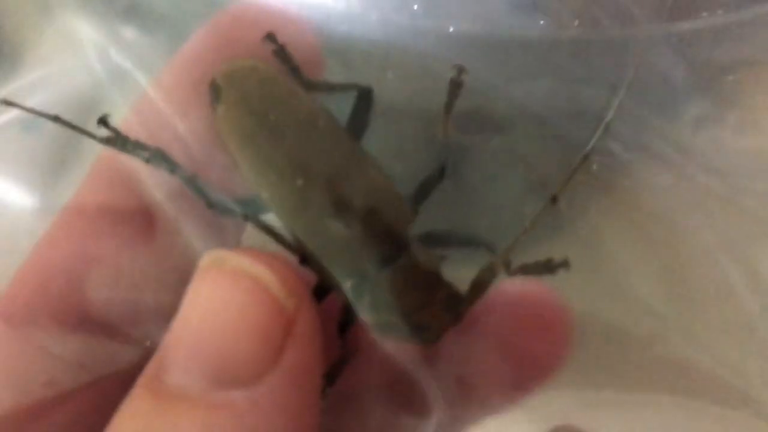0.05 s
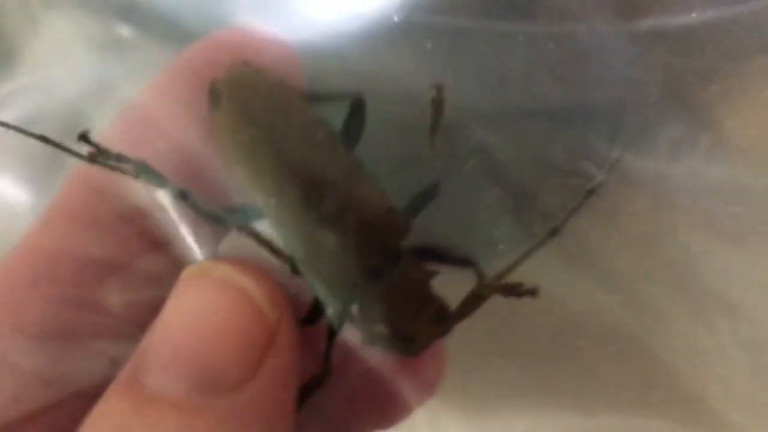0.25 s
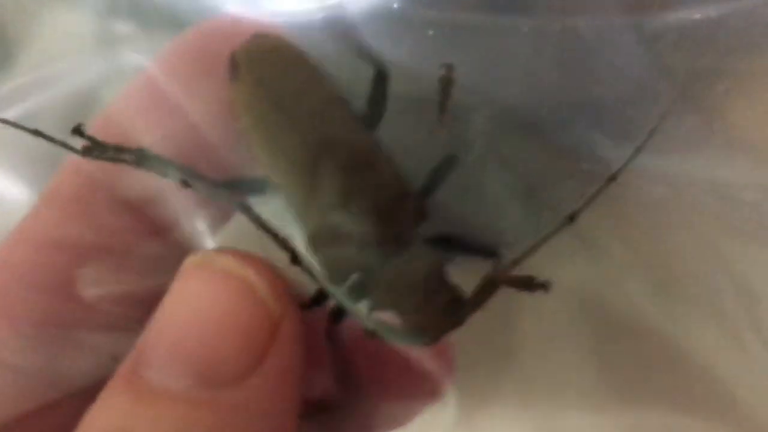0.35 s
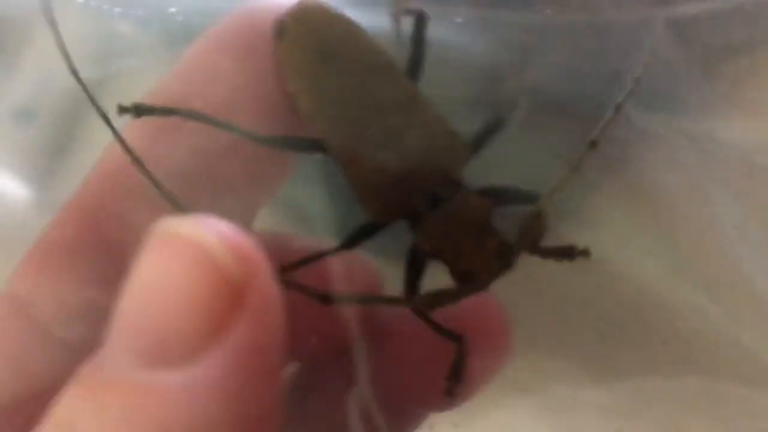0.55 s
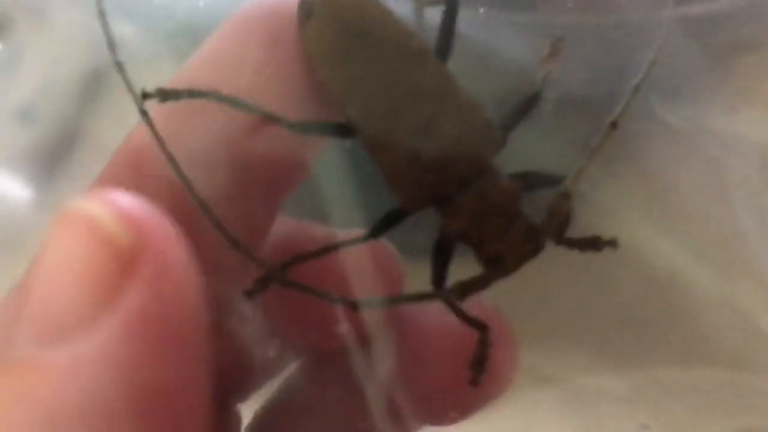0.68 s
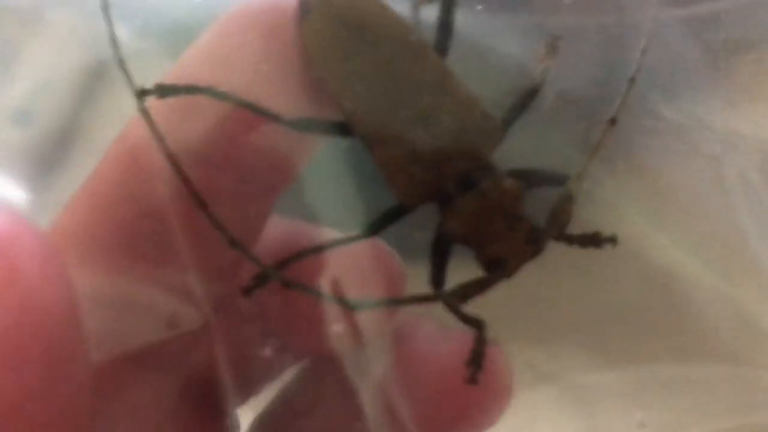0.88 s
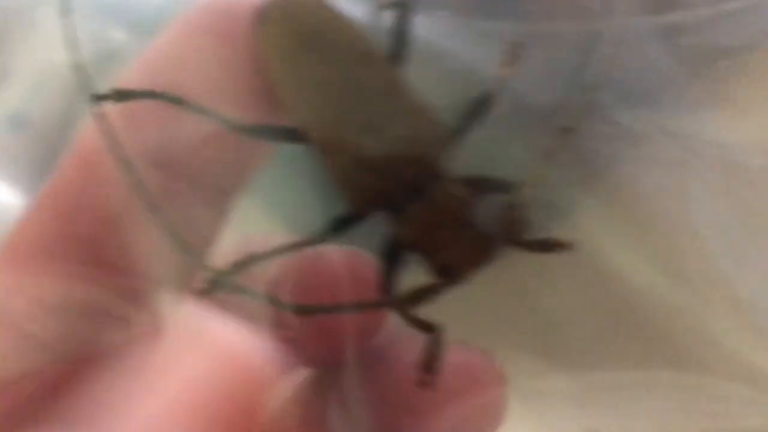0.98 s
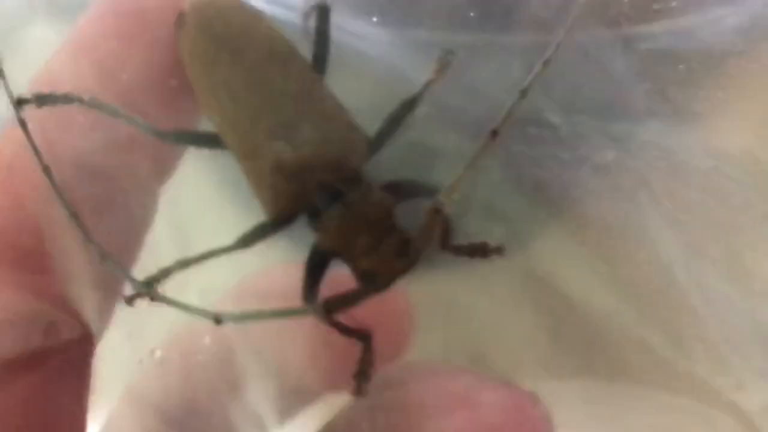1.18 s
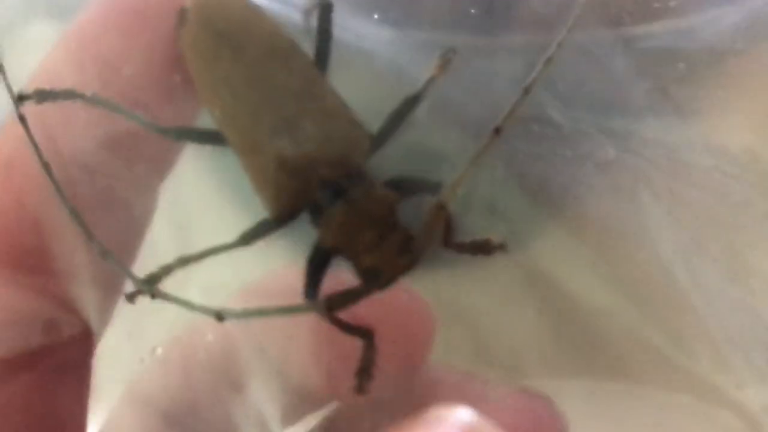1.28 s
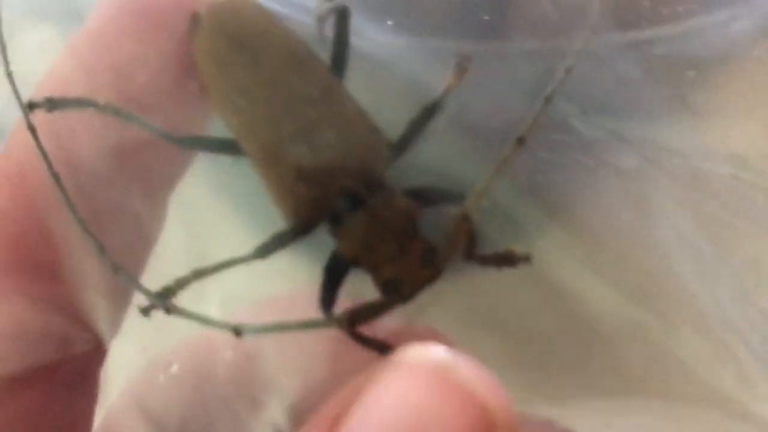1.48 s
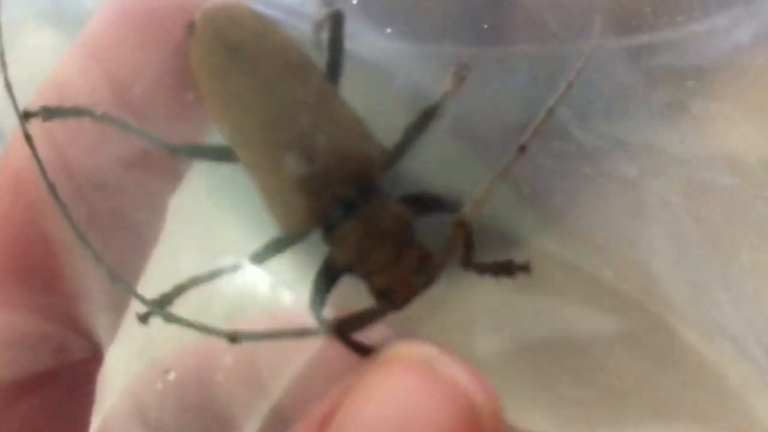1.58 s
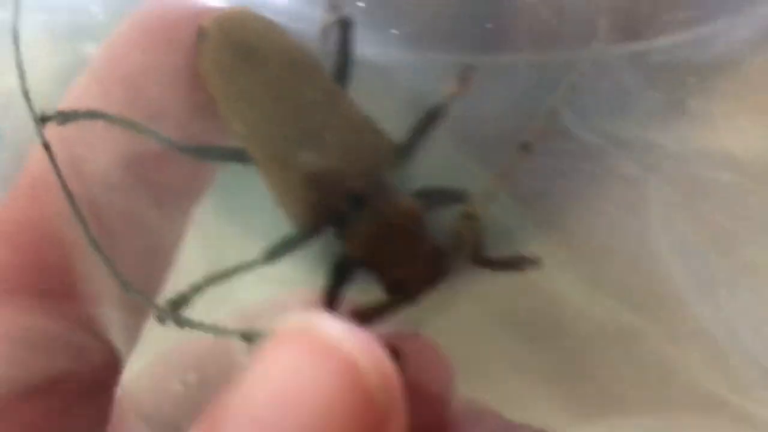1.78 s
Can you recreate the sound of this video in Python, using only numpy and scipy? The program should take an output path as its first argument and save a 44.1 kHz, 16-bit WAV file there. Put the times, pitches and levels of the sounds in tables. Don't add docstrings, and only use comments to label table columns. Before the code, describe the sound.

A beetle in a plastic bag squeaks raspily, close up in a quiet, low-humming room. Small crackles and a knock lead to a loud sharp snap at 0.2 s. A gritty buzzing rasp runs 0.3-0.45, with a brief higher return to 0.53; a weaker rasp follows at 0.56-0.72, with a faint zip until 0.8. Handling thumps mingle. Sparse ticks come near 1.0, then light crackles, faint creaks and dull bumps from 1.4 to 1.85.

```python
import sys
import numpy as np
from scipy import signal
from scipy.fft import rfft, irfft
from scipy.io import wavfile
from scipy.ndimage import uniform_filter1d

SR = 44100
rng = np.random.default_rng(int(sys.argv[2]) if len(sys.argv) > 2 else 0)


def elevation(decibels):
    levels = np.asarray(decibels, float)
    return 10 ** (levels / 20)


def log_audio(samples):
    frames = np.atleast_2d(samples).T
    limited = np.clip(frames, -1, 1)
    pcm = np.round(limited * 32767).astype(np.int16)
    wavfile.write(sys.argv[1], SR, pcm)


N = 81585
T = np.arange(N) / SR

# frequency in Hz, density in dB per Hz.
ROOM_SPECTRUM = [(16, -61), (28, -10.5), (127, -6), (170, -14.5), (211, -3), (378, -14), (421, -20),
                 (6320, -40), (16000, -46)]
# centre in Hz, width in Hz, level in dB.
APPLIANCE_HUMS = [(143, 10.3, -64), (198.5, 6.3, -69), (277.2, 30.8, -60.5), (4500, 120, -81.5),
                  (6160, 220, -77.5)]
# start in s, level in dB, pitch in Hz, T60 in s.
HAND_BUMPS = [
    (0.1418, -24, 346, 0.0074),
    (0.223, -36, 120, 0.036),
    (0.467, -35, 91.5, 0.036),
    (0.516, -29, 102.6, 0.041),
    (.561, -32.5, 136, 0.079),
    (1.652, -41.5, 110, 0.18),
    (1.667, -27, 285, 0.011),
    (1.687, -31, 283, 0.011),
    (1.831, -38, 103, 0.15),
]
# frequency in Hz, density in dB per Hz.
FILM_SPECTRUM = [(530, -6), (900, -48), (991, -2), (2140, -10), (4310, -6.5), (7140, -14), (12000, -14.5),
                 (16000, -45)]
# start in s, rise in s, T60 in s, level in dB, treble re the rest in dB.
FILM_RUSTLES = [
    (0.22, 0.0015, 0.16, -54, 1),
    (0.26, 0.0077, 0.62, -63, 3.5),
    (0.022, 0.003, .15, -61, -8),
    (0.927, 0.014, 1, -67, 5),
    (1.08, 0.0026, 0.033, -69, 1),
    (1.423, 0.0019, 0.38, -60.5, 4),
    (1.5, 0.0072, 0.22, -72, -10),
    (1.628, 0.0061, 0.32, -60.5, -11),
    (1.768, 0.041, 0.65, -61, -17),
]
# time in s, pitch in Hz, level in dB.
WAVERING_TONES = [
    [(1.5, 2500, -86), (1.53, 2350, -73), (1.6, 2080, -72), (1.66, 1900, -75), (1.69, 1850, -90)],
    [(1.49, 3500, -88), (1.52, 3480, -78), (1.62, 3350, -79), (1.67, 3250, -90)],
    [(.93, 4500, -88), (.96, 4500, -73), (1.04, 4480, -74), (1.08, 4450, -90)],
]
# start in s, peak in dB, ring in Hz, crack re peak in dB, knock re peak in dB.
BAG_SNAPS = [(.035, -60, 1500, -1, 13), (0.0841, -37, 980, -18, 5.5), (.105, -44.5, 1690, -12, -6),
             (0.1381, -27.5, 1140, -14, -14), (0.165, -47.5, 1500, -1, 14), (0.1895, -46, 4660, -14, 5),
             (.219, -9.5, 4350, -26, -17), (0.2192, -20, 1600, -16, -28), (.2191, -24, 9300, -30, -30),
             (.4301, -19.5, 2200, -24, -9), (.4615, -35, 2980, -13, -20), (0.4619, -38, 950, -24, -3.5),
             (0.5131, -35, 1100, -6, 2), (.541, -46, 950, -20, -2), (0.5605, -29, 2770, -34, -5.5),
             (1.0227, -44, 3900, -14, -30), (1.023, -41.5, 920, -13, -22), (1.089, -51, 12000, -31, -30),
             (1.081, -51, 2670, -14, -15), (1.254, -67, 4500, 9.5, -26), (1.4255, -40, 9300, -16, -41),
             (1.433, -47, 4200, -13, -16), (1.478, -55.5, 700, -15, 4), (1.515, -48, 2720, -16, 4),
             (1.536, -48, 1090, -10, 0), (1.5816, -42, 3800, -8.5, -24), (1.6425, -47.5, 2700, -1.5, 4),
             (1.645, -52.5, 4760, -10.5, -7), (1.659, -47.5, 3300, -7, -10), (1.67, -50, 765, -25, 14.5),
             (1.687, -50, 2880, -22, -9), (1.688, -46.5, 1050, -25, 9), (1.803, -55, 1400, -9, -3),
             (1.8245, -43, 1480, -12, -4), (1.832, -50, 9300, -9, 7)]
# time in s, ridge rate in Hz, level in dB.
PUSH_1_PATH = [
    (.308, 1078, -36.5),
    (.319, 1332, -33.5),
    (.339, 1508, -28.5),
    (.361, 1760, -28),
    (.377, 1674, -27.5),
    (.39, 1599, -28),
    (.428, 1505, -32),
    (.438, 950, -34),
    (.449, 611, -36.5),
]
RETURN_1_PATH = [
    (.465, 4300, -45),
    (.471, 4195, -38.5),
    (.482, 3900, -35),
    (.49, 3565, -38),
    (.5, 3370, -38.5),
    (.521, 3013, -42.5),
    (.529, 2730, -62),
]
PUSH_2_PATH = [
    (.563, 984, -41.5),
    (.584, 1301, -34),
    (.597, 1075, -35),
    (.618, 1149, -33.5),
    (.638, 1383, -33.5),
    (.648, 1689, -33.5),
    (.692, 1810, -36.5),
    (.7, 883, -36),
    (.722, 412, -43.5),
]
RETURN_2_PATH = [
    (.743, 4020, -41),
    (.75, 3913, -40),
    (.76, 3873, -42),
    (.766, 2927, -43),
    (.78, 2386, -48),
    (.792, 1850, -59),
]
# centre in Hz, width in Hz, level in dB, change over stroke in dB.
PUSH_1_SHELL = [(1540, 1620, -8, 1.5), (2780, 1070, -1, -2), (3710, 500, -3, -6), (5630, 860, 1.5, 10),
                (7750, 1430, 0, 4.5), (8890, 1780, 0, -1), (10240, 460, -11, -3), (11060, 720, -12, -2),
                (12700, 910, -7.5, -9)]
RETURN_1_SHELL = [(950, 290, -30, 4), (3094, 850, -7.5, 4), (3740, 390, -15, 6), (5500, 900, -5, 1),
                  (6300, 960, -1.5, 0), (7930, 640, 1.5, -10), (9270, 650, -0.5, -3),
                  (11600, 1240, -5.5, -11), (13300, 2300, -8, 3)]
PUSH_2_SHELL = [(1160, 2150, -7, -15), (2140, 870, -14, 3), (2980, 500, -7, 4), (4300, 670, -2, -5),
                (5630, 1640, 5, -9), (7740, 540, 4.5, -10), (8820, 1550, 1, -5), (11950, 1660, -1.5, -10),
                (13870, 2300, -7, -14)]
RETURN_2_SHELL = [(674, 200, -0.5, -5), (2500, 1600, -4.5, 9), (3900, 770, -9, -3), (5130, 1800, -0.5, 7),
                  (7700, 620, 0, -6.5), (8640, 740, -5, -3), (11400, 1200, -9, -5), (13370, 2800, -15, -3)]


def rms_one(x):
    return x / np.sqrt(np.mean(x ** 2) + 1e-20)


def resonance(x, hz, width_hz):
    r = np.exp(-np.pi * width_hz / SR)
    zeros = (1 - r * r) / 2 * np.array([1, 0, -1])
    poles = [1, -2 * r * np.cos(2 * np.pi * hz / SR), r * r]
    return signal.lfilter(zeros, poles, x)


def coloured(x, spectrum):
    hz, db = np.transpose(spectrum)
    bins_hz = np.maximum(np.arange(N // 2 + 1) * SR / N, 1)
    gain = elevation(np.interp(np.log(bins_hz), np.log(hz), db))
    return rms_one(irfft(rfft(x) * gain, N))


def drift(rate_hz):
    width = int(SR / rate_hz / 2)
    once = uniform_filter1d(rng.standard_normal(N), width)
    return rms_one(uniform_filter1d(once, width))


def decaying_sine(start_s, hz, t60_s):
    t = np.maximum(T - start_s, 0)
    return np.sin(2 * np.pi * hz * t) * elevation(-60 * t / t60_s)


def swelling_sine(start_s, hz, rise_s):
    t = np.maximum(T - start_s, 0)
    swell = (t / rise_s * np.exp(1 - t / rise_s)) ** 2
    return np.sin(2 * np.pi * hz * t) * swell


def room():
    floor_db, patchy_db = -54, .4
    out = elevation(floor_db + patchy_db * drift(6)) * coloured(rng.standard_normal(N), ROOM_SPECTRUM)
    white = rng.standard_normal(N)
    for hz, width_hz, db in APPLIANCE_HUMS:
        hum = resonance(resonance(white, hz, width_hz), hz, width_hz)
        out += elevation(db + .48 * drift(1.53)) * rms_one(hum)
    return out


def bumps():
    return sum(elevation(db) * decaying_sine(s, hz, t60_s) for s, db, hz, t60_s in HAND_BUMPS)


def rustles():
    grains_per_s, grain_spread_db, split_hz = 14000, 1.2, 5500
    present = rng.random(N) < grains_per_s / SR
    size = elevation(grain_spread_db * rng.exponential(1, N))
    grains = present * size * rng.choice([-1, 1], N)
    film = elevation(1.8 * drift(60)) * coloured(grains, FILM_SPECTRUM)
    dull = signal.sosfilt(signal.butter(2, split_hz, "low", fs=SR, output="sos"), film)
    bright = signal.sosfilt(signal.butter(2, split_hz, "high", fs=SR, output="sos"), film)
    out = np.zeros(N)
    for s, rise_s, t60_s, db, bright_db in FILM_RUSTLES:
        rise = np.clip((T - s) / rise_s, 0, 1)
        decay = elevation(db - 60 * np.maximum(T - s - rise_s, 0) / t60_s)
        out += decay * rise * (dull - elevation(bright_db) * bright)
    return out


def creak(rows):
    s, hz, db = np.transpose(rows)
    pitch_hz = np.interp(T, s, hz) + 25 * drift(53.3)
    level_db = np.interp(T, s, db, left=-120, right=-120) + 2.6 * drift(50)
    return elevation(level_db) * np.sin(2 * np.pi * np.cumsum(pitch_hz) / SR)


def snaps():
    ring_cycles, rise_s, overtone_share = .44, .00012, .2
    crack_hz, crack_width_hz, crack_decay_s = 4720, 1840, .0011
    knock_delay_s, knock_hz, knock_t60_s = .00114, 627, .0052
    grit = rms_one(resonance(rng.standard_normal(N), crack_hz, crack_width_hz))
    out = np.zeros(N)
    for s, db, hz, crack_db, knock_db in BAG_SNAPS:
        rise = ring_cycles / hz + rise_s
        ring = swelling_sine(s, hz, rise) - overtone_share * swelling_sine(s, 2.36 * hz, .7 * rise)
        crack = grit * (T > s) * np.exp(-np.maximum(T - s, 0) / crack_decay_s)
        knock = decaying_sine(s + knock_delay_s, knock_hz, knock_t60_s)
        out += elevation(db) * (ring + elevation(crack_db) * crack + elevation(knock_db) * knock)
    return out


def ridge_clicks(rows, uneven, chance):
    wobble_share, wobble_hz, scatter_db, oversample = .024, 140, 2.0, 4
    s, hz, _ = np.transpose(rows)
    speed_hz = np.interp(T, s, hz) * (1 + wobble_share * drift(wobble_hz))
    ridges = np.cumsum(speed_hz * (T >= s[0]) * (T <= s[-1])) / SR
    count = int(ridges[-1])
    when = np.interp(np.arange(count) + .5, ridges, T)
    scatter = np.interp(when, np.linspace(s[0], s[-1], len(uneven)), uneven)
    when = when + chance[:count, 0] * scatter / np.interp(when, s, hz)
    size = elevation(scatter_db * chance[:count, 1]) / np.sqrt(np.interp(when, s, hz))
    fine = np.zeros(oversample * N)
    fine[(when * oversample * SR).astype(int)] = size
    return signal.resample_poly(fine, 1, oversample)


def stroke(rows, shell, uneven):
    edge_s, scrape_share, flicker_db, even_s = .002, .26, 1.3, .012
    case_hz, case_width_hz, case_db = 650, 900, -13
    s, _, db = np.transpose(rows)
    chance = rng.standard_normal((400, 2))
    inside = np.clip(np.minimum(T - s[0], s[-1] - T) / edge_s, 0, 1)
    along = np.clip((T - s[0]) / (s[-1] - s[0]), 0, 1) - .5
    scrape = rng.standard_normal(N) * inside
    clicks = ridge_clicks(rows, uneven, chance)
    drive = clicks / np.std(clicks[inside > 0]) + scrape_share * scrape
    body = elevation(case_db) * resonance(scrape, case_hz, case_width_hz)
    for hz, width_hz, peak_db, change_db in shell:
        ring = resonance(resonance(drive, hz, 1.7 * width_hz), hz, 1.7 * width_hz)
        body = body + elevation(peak_db + change_db * along + flicker_db * drift(29)) * ring
    width = int(even_s * SR)
    power = uniform_filter1d(body ** 2, width) / np.maximum(uniform_filter1d(inside, width), .2)
    steady = body / np.sqrt(np.abs(power) + .01 * np.var(body[inside > 0]))
    return elevation(np.interp(T, s, db)) * steady


def beetle():
    push_1 = stroke(PUSH_1_PATH, PUSH_1_SHELL, [.045, .06, .085, .115, .16])
    return_1 = stroke(RETURN_1_PATH, RETURN_1_SHELL, [.08, .15, .15, .07, .06])
    push_2 = stroke(PUSH_2_PATH, PUSH_2_SHELL, [.055, .06, .11, .19, .22])
    return_2 = stroke(RETURN_2_PATH, RETURN_2_SHELL, [.17, .17, .17, .1, .09])
    return push_1 + return_1 + push_2 + return_2


def bag(x):
    early_t60_s, early_db, tail_t60_s, tail_db = .012, -8.5, .29, -16
    dip_hz, dip_width_hz, dip_share = 4280, 610, .26
    t = T[:SR // 5]
    early = rng.standard_normal(len(t)) * elevation(-60 * t / early_t60_s)
    tail = rng.standard_normal(len(t)) * elevation(-60 * t / tail_t60_s)
    echo = elevation(early_db) * early / np.linalg.norm(early) + elevation(tail_db) * tail / np.linalg.norm(tail)
    inside = .91 * (x + signal.fftconvolve(x, echo)[:N])
    return inside - dip_share * resonance(inside, dip_hz, dip_width_hz)


def scene():
    rasp = bag(beetle())
    film = snaps() + rustles()
    mono = rasp + film + bumps() + sum(creak(rows) for rows in WAVERING_TONES) + room()
    return np.array([mono, mono])


def low_pass(x):
    return signal.sosfilt(signal.butter(12, 16820, fs=SR, output="sos"), x)


def record(dry):
    port_hz, port_width_hz, top_hz = 10600, 600, 15870
    thin = signal.sosfilt(signal.butter(3, 36, "high", fs=SR, output="sos"), dry)
    notched = thin - .5 * resonance(thin, port_hz, port_width_hz)
    mix = signal.sosfilt(signal.cheby2(24, 60, top_hz, fs=SR, output="sos"), notched)
    return low_pass(mix)


dry = scene()
out = record(dry)
log_audio(out)
```